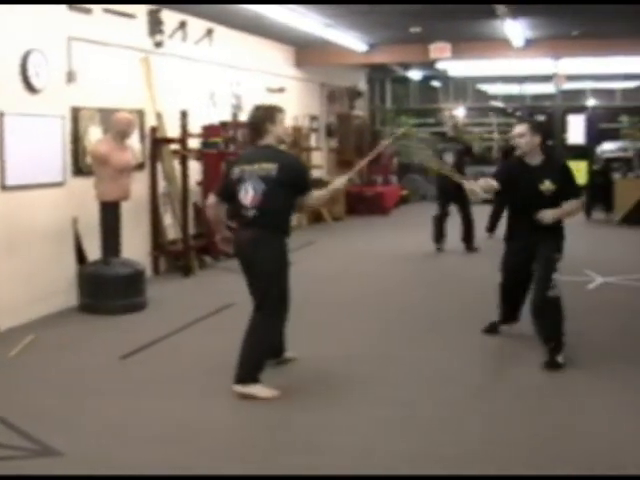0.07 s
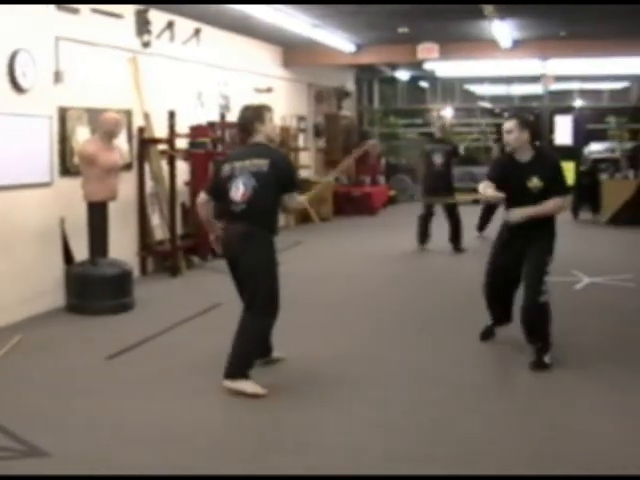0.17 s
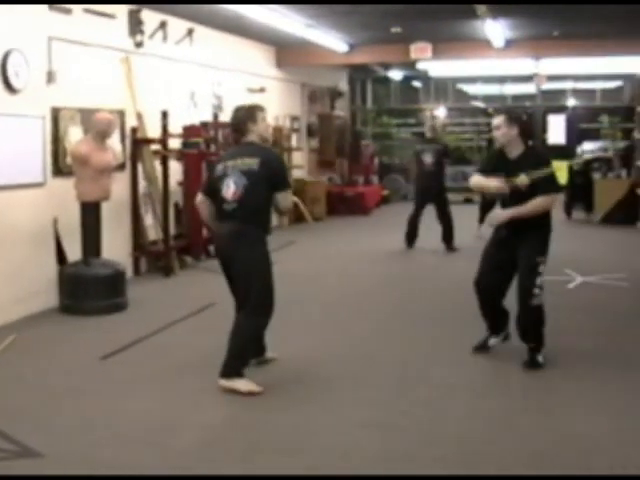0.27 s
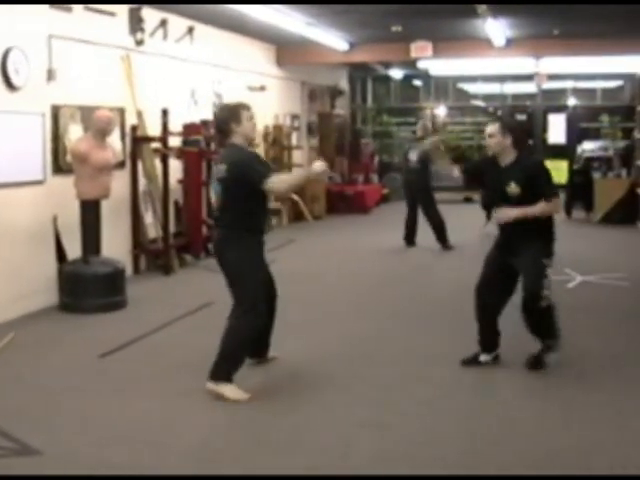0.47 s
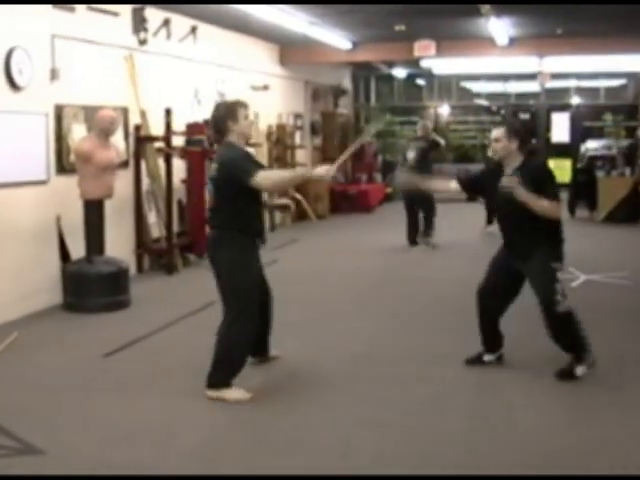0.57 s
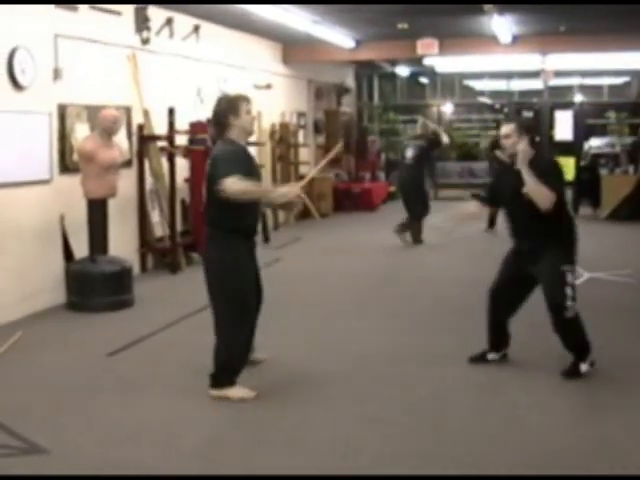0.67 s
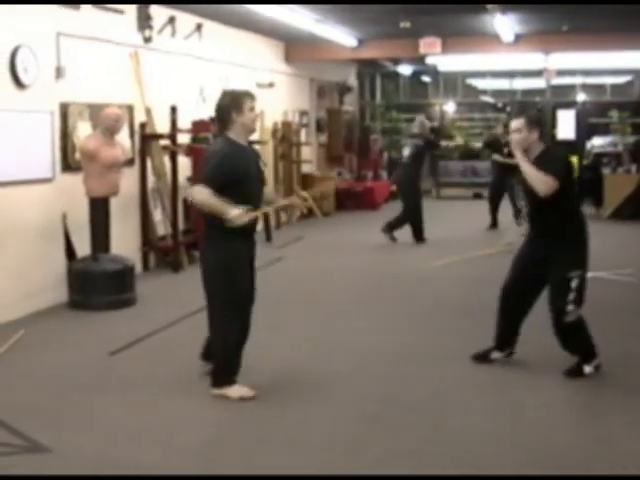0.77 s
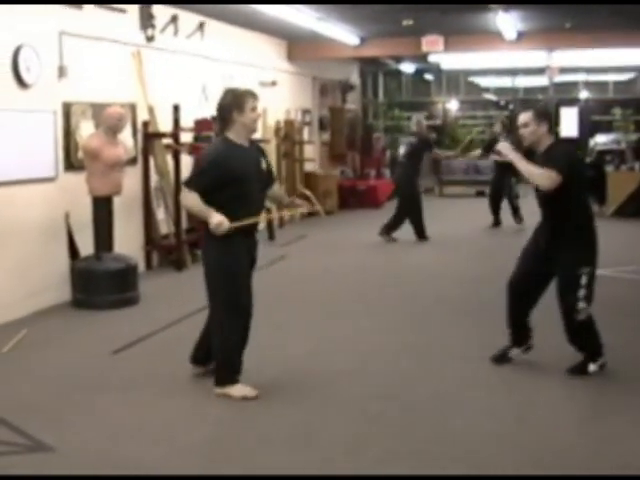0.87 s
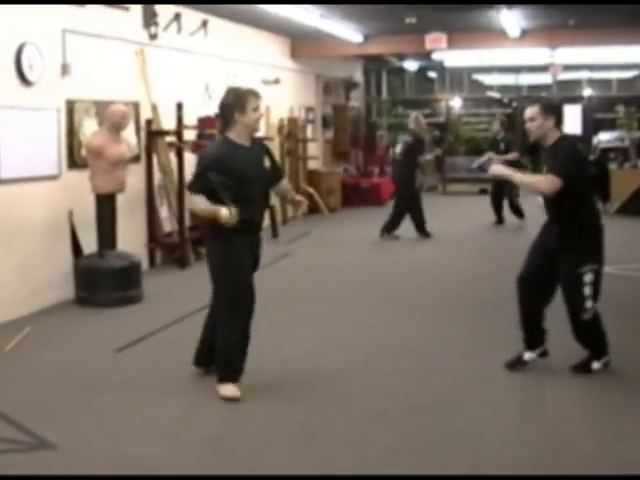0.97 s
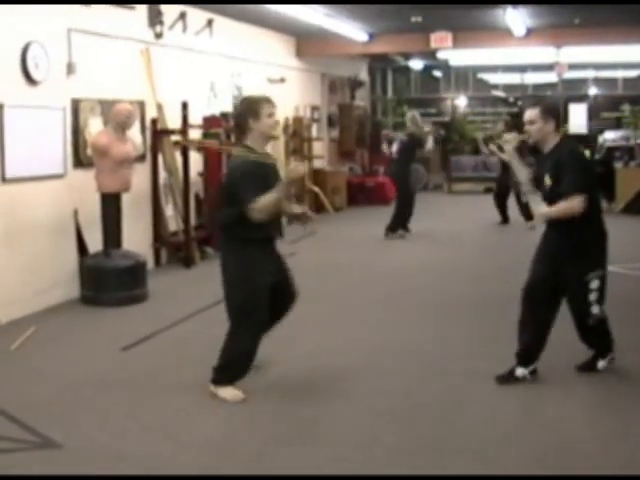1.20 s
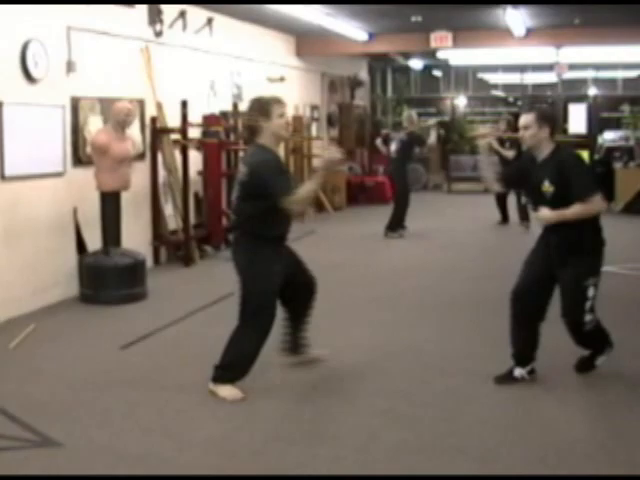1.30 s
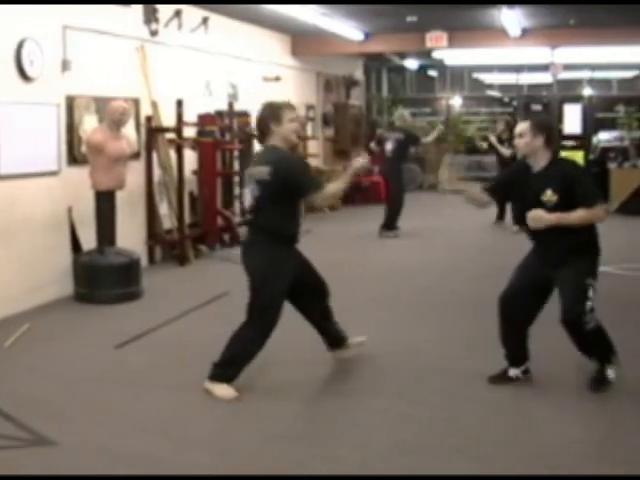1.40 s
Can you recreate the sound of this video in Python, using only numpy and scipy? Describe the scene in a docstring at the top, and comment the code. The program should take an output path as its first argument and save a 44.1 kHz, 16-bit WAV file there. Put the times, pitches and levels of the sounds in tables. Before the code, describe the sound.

Wooden sticks clack sharply four times in an echoing hall as feet shuffle on carpet.

```python
"""Wooden sticks clack sharply four times as two partners trade blows in an echoing training hall.
Each clack is a burst of bright noise plus damped tones from both sticks. A faint dull knock comes
before them and a stronger one after. Feet shuffle on the carpet over a low room rumble, both made
of shaped noise, and a sole squeaks faintly. The clacks overload the recorder, whose gain control
ducks and creeps back up while the hall rings."""
import sys
import numpy as np
from scipy import signal
from scipy.fft import rfft, irfft
from scipy.io import wavfile

SR = 44100
rng = np.random.default_rng(int(sys.argv[2]) if len(sys.argv) > 2 else 0)


def dump(signal):
    """Clip the signal to [-1, 1] and save it as 16-bit WAV at the path in sys.argv[1]."""
    limited = np.clip(np.atleast_2d(signal).T, -1, 1)
    pcm = np.round(limited * 32767).astype(np.int16)
    wavfile.write(sys.argv[1], SR, pcm)


N = 63945
T = np.arange(N) / SR  # time of each sample, in seconds

# noise colour of hard contact; only its shape matters: (frequency [Hz], level per Hz [dB])
CONTACT_COLOUR = [(100, -22), (400, -11.5), (1000, -17.5), (2000, -19), (3500, -4), (5000, 7.5), (6300, -1),
                  (7500, -28), (11000, -27.5), (16000, -19)]


def from_db(db):
    """Turn decibels into a plain multiplier."""
    return 10 ** (np.asarray(db) / 20)


def at_hz(points, hz):
    """Read a table between its points, on a log-frequency axis."""
    points = np.array(points)
    log_hz = np.log(np.maximum(hz, 1))
    return np.interp(log_hz, np.log(points[:, 0]), points[:, 1])


def low_cut(x, hz, order):
    """Remove the sound below a frequency with a high-pass filter."""
    sos = signal.butter(order, hz, "high", fs=SR, output="sos")
    return signal.sosfilt(sos, x + 1e-18)


def coloured(spectrum):
    """Shape random noise to the given spectrum, then bring its rms level to 1."""
    hz = np.fft.rfftfreq(N, 1 / SR)
    noise = irfft(rfft(rng.standard_normal(N)) * from_db(at_hz(spectrum, hz)), N)
    return noise / noise.std()


def fade(start, t60):
    """Start suddenly, then die away exponentially by 60 dB in t60 seconds."""
    decay = np.exp(-np.log(1000) * np.maximum(T - start, 0) / t60)
    return (T >= start) * decay


def ring(start, modes):
    """One blow sets off several damped sine tones, with alternating signs."""
    total = 0
    for k, (hz, db, t60) in enumerate(modes):
        tone = fade(start, t60) * np.sin(2 * np.pi * hz * (T - start))
        total = total + (-1) ** k * from_db(db) * tone
    return total


def diffuse(mid, side):
    """Blend two unrelated noises into left and right channels that are alike to a set degree per pitch."""
    # how alike left and right are, limited to -1..1 after reading: (frequency [Hz], likeness)
    likeness = [(40, 0.99), (200, 1), (2500, 8), (4500, .95), (8000, -0.2), (15000, 1)]
    alike = np.clip(at_hz(likeness, np.fft.rfftfreq(N, 1 / SR)), -1, 1)
    shared = rfft(mid) * np.sqrt((1 + alike) / 2)
    opposed = rfft(side) * np.sqrt((1 - alike) / 2)
    return irfft(np.array([shared + opposed, shared - opposed]), N)


def room_rumble():
    """The steady, mostly low sound of the room is shaped noise at a constant level."""
    level_db = -39.5
    # noise colour; only its shape matters: (frequency [Hz], level per Hz [dB])
    rumble_colour = [(25, -9), (70, -5.5), (140, -0.5), (250, 3), (460, -12), (640, -7.5), (1300, -22.5),
                     (4800, -19), (6200, -24.5), (7600, -45), (10000, -42), (16000, -56)]
    return from_db(level_db) * diffuse(coloured(rumble_colour), coloured(rumble_colour))


def sole_squeak():
    """A sole squeaks faintly: one high tone that dies away."""
    start_s, level_db = 0.18, -37
    # the squeak's tone: (frequency [Hz], level [dB], t60 [s])
    squeak_tone = [(3300, 0, 0.19)]
    return from_db(level_db) * ring(start_s, squeak_tone)


def feet():
    """Soles land and rub on the carpet, so soft noise swells and dies away with each step."""
    # the steps: (time [s], level [dB], rise [s], t60 [s])
    steps = [(0.138, -33.5, .02, 0.61), (0.56, -32, 0.018, 0.37), (0.667, -30, .03, 0.5),
             (0.894, -26, 0.016, 0.37), (1.165, -29.5, 0.019, 0.31), (1.362, -28, 0.026, 0.35)]
    # noise colour of the rubbing; only its shape matters: (frequency [Hz], level per Hz [dB])
    shuffle_colour = [(40, -41), (100, -11), (160, -2), (280, -3.5), (450, -10.5), (620, -8), (1200, -10),
                      (3300, -15.5), (5500, -15.5), (8000, -42), (15000, -44)]
    loudness = 0
    for start, db, rise, t60 in steps:
        swell = np.clip((T - start) / rise, 0, 1)
        loudness = loudness + from_db(db) * swell * fade(start, t60)
    return loudness * diffuse(coloured(shuffle_colour), coloured(shuffle_colour))


def hall(x):
    """Dense reverberation builds up quickly, then dies at its own rate in each pitch band."""
    build_s = 0.0056
    # echoes off the far walls arrive in a bunch
    far_walls_s, far_walls_spread_s, far_walls_db = 0.051, 0.01, 2.5
    # how long each band takes to fall by 60 dB: (frequency [Hz], t60 [s])
    band_t60 = [(200, 0.64), (1200, 1.49), (2300, 0.88), (4500, 0.68), (7000, 0.58), (12000, 0.23)]
    # tone colour of the reverberation; only its shape matters: (frequency [Hz], level [dB])
    hall_colour = [(60, -29), (400, 0), (700, 5.5), (5800, -2), (7500, -4.5), (10000, -1.5), (12500, -3.5),
                   (16000, -26)]

    hz = np.fft.rfftfreq(N, 1 / SR)
    noise = rfft(diffuse(*rng.standard_normal((2, N)))) * from_db(at_hz(hall_colour, hz))
    tail = 0
    for k, (_, t60) in enumerate(band_t60):
        # each band fades into its neighbours
        weights = [(row[0], j == k) for j, row in enumerate(band_t60)]
        band = irfft(noise * at_hz(weights, hz), N)
        tail = tail + band * fade(0, t60)
    bunch = np.exp(-0.5 * ((T - far_walls_s) / far_walls_spread_s) ** 2)
    tail = tail * (1 - np.exp(-T / build_s)) * from_db(far_walls_db * bunch)
    tail = tail / np.sqrt(np.sum(tail[0] ** 2))  # left channel gets an energy of 1
    return signal.fftconvolve(x[None], tail, axes=1)[:, :N]


def near_paths(x):
    """The direct sound is joined by delayed, weaker copies from the nearest surfaces."""
    # floor, ceiling and near walls: (delay [s], level [dB])
    reflections = [(.0019, -8), (.0043, -11.5), (.0073, -11.5), (.0121, -10.5)]
    total = x
    for delay, db in reflections:
        total = total + from_db(db) * np.interp(T - delay, T, x, left=0)
    return total


def knocks():
    """A soft, hollow contact rings at a few low tones, with a short noisy tick."""
    tick_t60_s = 0.02
    # the knocks: (time [s], ring level [dB], tick level [dB])
    knock_times = [(0.144, -35.5, -61), (1.3812, -22.5, -21.5)]
    # tones of the hollow ring: (frequency [Hz], level [dB], t60 [s])
    knock_modes = [(615, 0.5, 0.18), (705, 0, 0.048), (814, 0.5, 0.042)]
    total = 0
    for start, ring_db, tick_db in knock_times:
        tick = coloured(CONTACT_COLOUR) * fade(start, tick_t60_s)
        total = total + from_db(ring_db) * ring(start, knock_modes) + from_db(tick_db) * tick
    return total


def crack(start, t60):
    """Hard contact makes a burst of bright noise with its low end removed."""
    return low_cut(coloured(CONTACT_COLOUR) * fade(start, t60), 1500, order=2)


def sticks():
    """Each blow cracks, rings both sticks and jolts the hands; returns the clacks and their hall share."""
    crack_t60_s = 0.013
    # the crack reaches the hall smeared by the clutter along the walls
    scatter_db, scatter_t60_s = -9, 0.047
    # the blows: (time [s], first stick level [dB], second stick level [dB], crack level [dB],
    #             wood is weak below [Hz], level sent to the hall [dB])
    strikes = [(0.2332, 20, -1, 19, 2500, -1.5), (0.3685, -6.5, 11, 9.5, 1500, -3.5),
               (0.7249, 20.5, 10.5, 17, 1780, -2), (0.9618, -10, 14.5, 13.5, 2800, -1.5)]
    # bending tones of each stick, before the low cut: (frequency [Hz], level [dB], t60 [s])
    first_stick = [(1921, -16.5, 0.025), (2510, -12, 0.025), (3089, -9, 0.022), (3767, -9.5, 0.016),
                   (4467, -1, 0.012), (4975, 0, .013), (5769, -7, 0.012)]
    second_stick = [(1572, -25, 0.054), (2207, -16, 0.027), (2800, -13, 0.019), (3500, -7.5, 0.015),
                    (4354, -4, 0.014), (5280, -3.5, .012), (5990, -6.5, 0.0087)]
    # jolt in the gripping hands, relative to the first stick: (frequency [Hz], level [dB], t60 [s])
    grip_modes = [(141, -36, 0.067), (380, -49.5, 0.014)]

    clacks, send = 0, 0
    for start, first_db, second_db, crack_db, low_hz, send_db in strikes:
        first = from_db(first_db) * ring(start, first_stick)
        second = from_db(second_db) * ring(start, second_stick)
        wood = low_cut(first + second, low_hz, order=3)
        contact = from_db(crack_db) * crack(start, crack_t60_s)
        jolt = from_db(first_db) * ring(start, grip_modes)
        clacks = clacks + wood + contact + jolt
        smeared = from_db(crack_db + scatter_db) * crack(start, scatter_t60_s)
        send = send + from_db(send_db) * (wood + smeared)
    return clacks, send


def scene():
    """Sticks and knocks sound in the hall, over the feet and the rumble."""
    knock_send_db = -17
    clacks, clack_send = sticks()
    knock = knocks()
    direct = near_paths(clacks + knock)
    echoing = hall(clack_send + from_db(knock_send_db) * knock)
    return direct + echoing + feet() + sole_squeak() + room_rumble()


def microphones(x):
    """The right microphone has its own tone colour and phase in the treble."""
    # right against left: (frequency [Hz], level [dB])
    right_colour = [(2700, -1), (3700, -2.5), (4500, -7), (5900, -7.5), (7300, -3), (9000, 8.5), (14000, 6)]
    # right ahead of left: (frequency [Hz], lead [radians])
    right_lead = [(1000, 0), (2600, 0.12), (4500, 0.42), (6000, 2.03), (7200, 4.5), (9000, 4)]
    hz = np.fft.rfftfreq(2 * N, 1 / SR)
    response = from_db(at_hz(right_colour, hz)) * np.exp(1j * at_hz(right_lead, hz))
    right = irfft(rfft(x[1], 2 * N) * response)[:N]
    return np.array([x[0], right])


def gain_control(x):
    """Loud peaks turn the gain down after a short lag; it then eases back up."""
    threshold_db, attack_s, release_s = 7, 0.0076, 0.18
    peak_db = 20 * np.log10(np.abs(x).max(axis=0) + 1e-9)
    over_db = np.maximum(peak_db - threshold_db, 0)
    release = np.exp(-T / release_s)
    # hold each peak while letting it shrink with time
    held_db = np.maximum.accumulate(over_db / release) * release
    lag = np.exp(-1 / (attack_s * SR))
    duck_db = signal.lfilter([1 - lag], [1, -lag], held_db)
    return x * from_db(-duck_db)


def saturate(x):
    """Peaks flatten as they near full scale."""
    hardness = 3.3
    return x / (1 + np.abs(x) ** hardness) ** (1 / hardness)


def record(dry):
    """Gain ducks, what still gets through too loud clips a little unevenly, and both ends are cut."""
    clip_offset = 0.036  # makes the two sides of the wave clip differently
    low_hz, top_hz = 89, 15800
    x = gain_control(microphones(dry))
    clipped = saturate(x + clip_offset) - saturate(clip_offset)
    x = low_cut(clipped, low_hz, order=2)
    top_cut = signal.ellip(8, 0.2, 60, top_hz, fs=SR, output="sos")
    return signal.sosfilt(top_cut, x)


dry = scene()
out = record(dry)
dump(out)
```